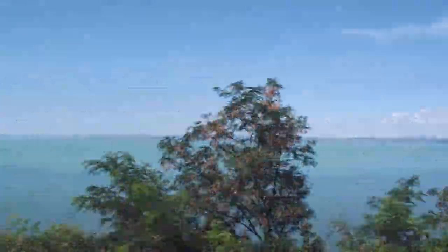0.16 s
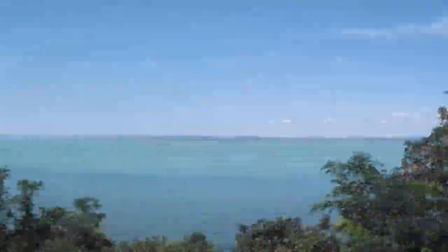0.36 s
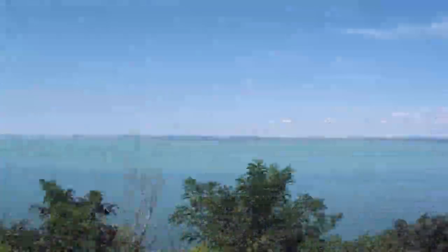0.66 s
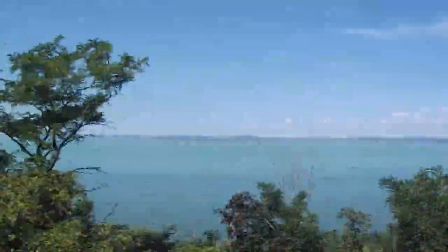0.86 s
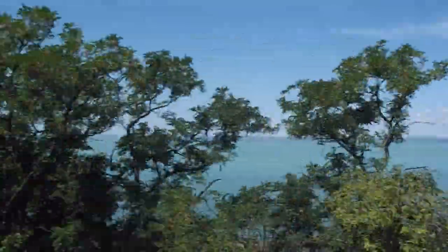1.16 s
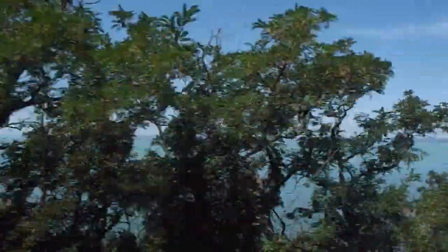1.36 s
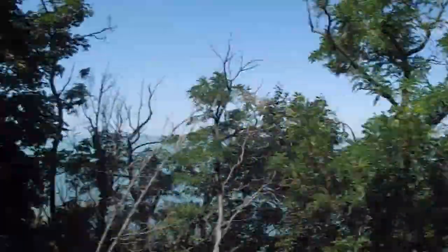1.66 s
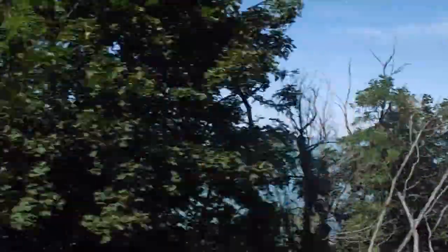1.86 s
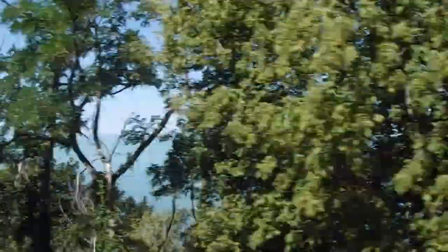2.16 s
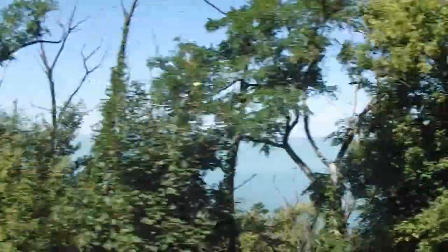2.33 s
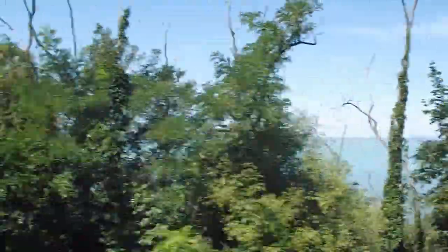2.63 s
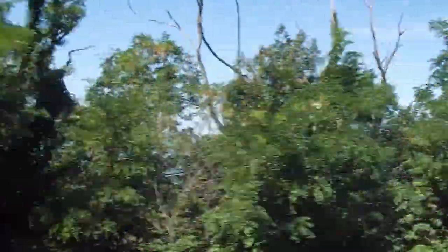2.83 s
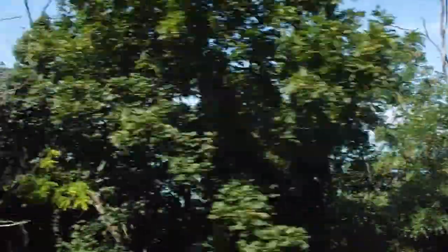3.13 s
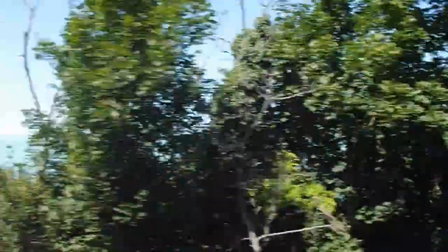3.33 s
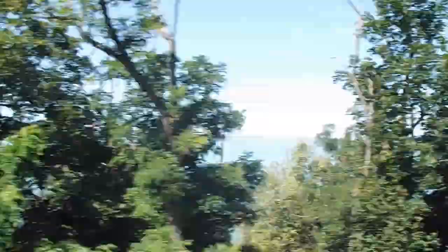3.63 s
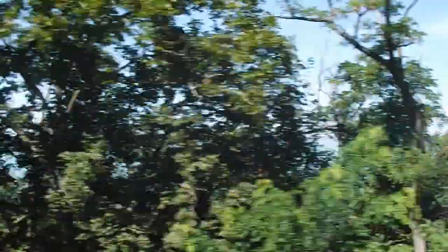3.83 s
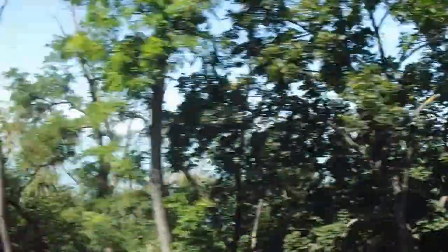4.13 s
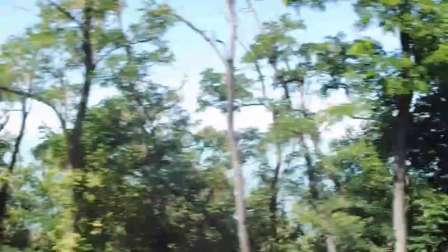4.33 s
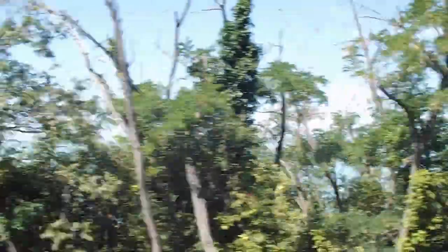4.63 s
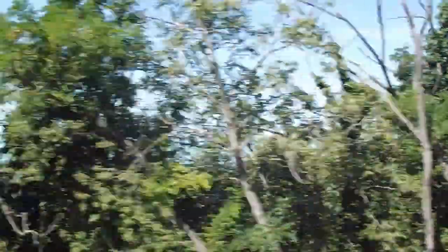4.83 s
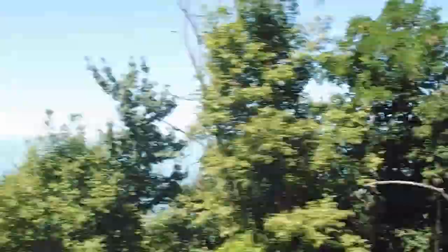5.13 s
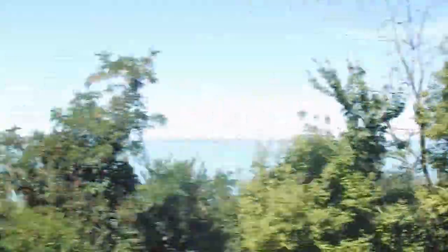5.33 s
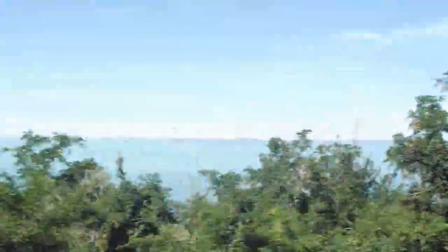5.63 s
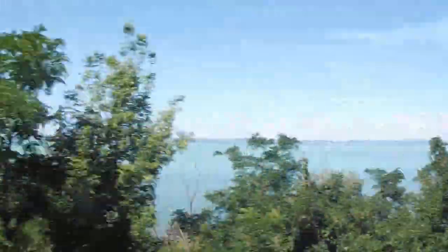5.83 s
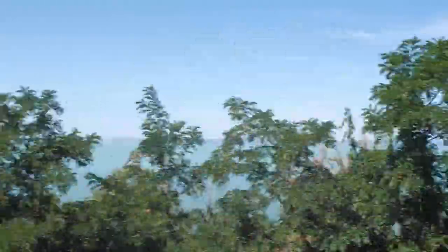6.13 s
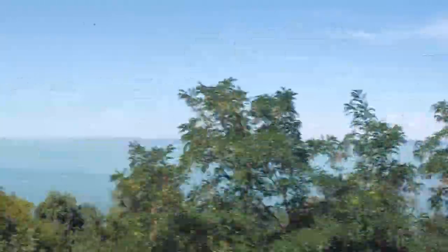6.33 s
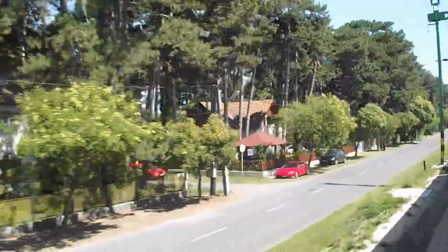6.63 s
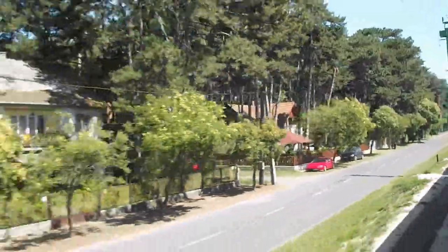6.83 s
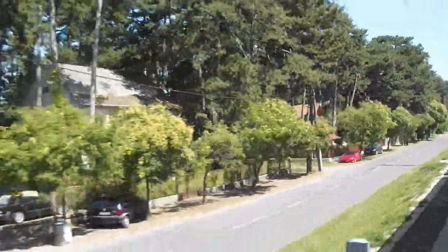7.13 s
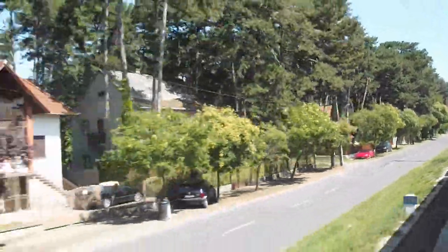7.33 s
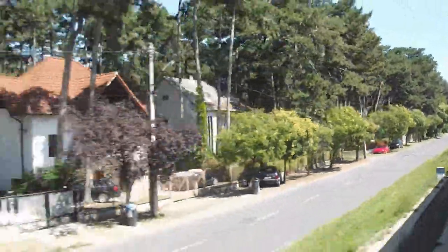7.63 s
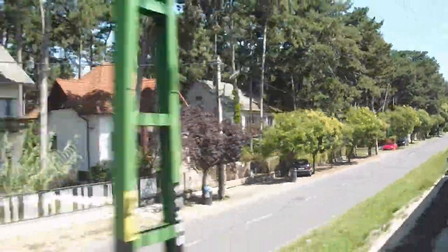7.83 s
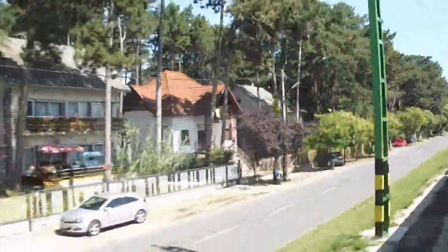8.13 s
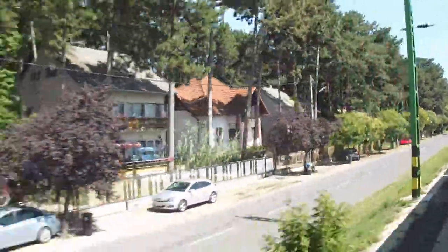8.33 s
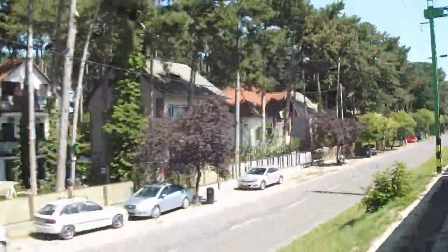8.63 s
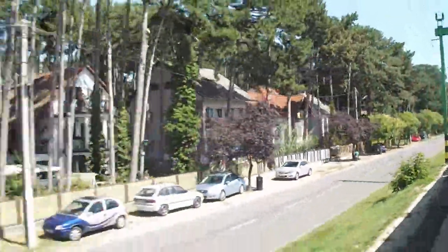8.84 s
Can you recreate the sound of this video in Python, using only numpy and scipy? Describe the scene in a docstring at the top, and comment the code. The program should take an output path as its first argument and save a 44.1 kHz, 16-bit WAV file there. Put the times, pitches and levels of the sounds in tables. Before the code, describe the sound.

A deep, uneven wind rumble hits the microphone directly, held at an open train window. From the start, brief gusts slam into it with distorted thumps and crackles, sometimes singly and sometimes in quick bunches. The soft rush of travel stays underneath. Later, as the train passes from shore to houses, smaller pops take over for a moment before hard, rasping knocks return.

```python
"""Wind batters a small microphone at the open window of a moving train.
Turbulence makes the pressure fluctuate: large eddies rumble, small ones flutter and pop.
Sudden gusts drive the input far into overload, where clipping turns them into square-edged
knocks and rasps. Behind them the rush of the ride hisses through the resonances of the
microphone port, first along the shore and then among houses."""
import sys
import numpy as np
from scipy import signal
from scipy.fft import rfft, irfft
from scipy.io import wavfile
from scipy.ndimage import uniform_filter1d, map_coordinates

SR = 44100
rng = np.random.default_rng(int(sys.argv[2]) if len(sys.argv) > 2 else 0)


def digitize_waveform(pressure):
    """Quantize a signal to 16-bit integers and store it at the path in sys.argv[1].

    Rows of a 2-D input are taken as channels; values are limited to [-1, 1].
    """
    field = np.atleast_2d(pressure).T
    bounded = np.clip(field, -1, 1)
    quanta = np.round(bounded * 32767).astype(np.int16)
    wavfile.write(sys.argv[1], SR, quanta)


N = 396018
TIME = np.arange(N) / SR
TOWN_S = 6.592  # the houses begin

# Gusts on the port, levels relative:
# (start [s], end [s], pressure [dB], nominal eddy rate [Hz], hiss [dB], extra gain of the slam [dB])
GUST_EVENTS = [(0, 0.063, -3.5, 156, -15, 4.5), (0.066, 0.117, -9, 49, -17, -14),
               (0.123, 0.206, 2.5, 55.4, -20, 8), (0.464, 0.535, 0.5, 74, -15.5, 13.5),
               (0.552, 0.637, 1.5, 65, -22.5, -12), (0.826, 0.87, 0, 96, -21, 16),
               (1.42, 1.482, 1, 35, -9, 5.5), (1.486, 1.56, 9.5, 99, -16, -6),
               (2.067, 2.118, 4.5, 188, -10, 15), (2.561, 2.62, -4, 66.6, -27.5, 12.5),
               (2.818, 2.848, 10.5, 44.8, -7.5, 6.5), (2.966, 2.997, -6.5, 37.2, -18, 14),
               (3.147, 3.193, 9, 112, -12, 12), (3.686, 3.719, 6.5, 58.7, -24, 16),
               (3.724, 3.743, 7, 125, -10.5, -8), (4.007, 4.029, 9.5, 93, -9.5, 6),
               (4.028, 4.067, -20, 48.7, -18, -1), (4.283, 4.313, 2, 34.2, -11, 3),
               (4.319, 4.373, -12.5, 150, -15.5, -14), (4.362, 4.416, -1.5, 37.3, -51, 4.5),
               (4.508, 4.579, 5.5, 155.5, -10, 16), (4.851, 4.874, 1.5, 118, -18, 16),
               (4.884, 4.961, -3.5, 163, -16, 11.5), (4.975, 5.068, -1, 50.3, -14.5, -7),
               (5.393, 5.442, 2.5, 35.8, -12.5, 10), (5.454, 5.509, -7, 68.4, -38, 8),
               (5.838, 5.903, 5.5, 150, -9, -3), (6.3, 6.321, -3.5, 91.4, -39, 27),
               (6.347, 6.37, 0, 110, -22.5, 3), (6.656, 6.754, 5.5, 164, -13.5, 11),
               (7.641, 7.686, 8, 282, -2, 4), (7.994, 8.037, 2, 265, -10.5, 22.5),
               (8.083, 8.142, 7, 303, -7, 19), (8.17, 8.279, -4.5, 162, -27, 5.5),
               (8.596, 8.62, 8, 217, -5.5, 4), (8.604, 8.782, 0.5, 147, -18.5, -5),
               (8.863, 8.909, 6.5, 260, -6, 14), (8.92, 8.99, 1.5, 47, -14, -14)]
# Single small eddies that pop on the port: (time [s], relative level [dB])
PUFF_EVENTS = [(0.284, -20), (0.398, -14), (0.666, -3.5), (1.139, -19), (2.419, -20), (3.415, -18.5),
               (4.476, -22), (5.191, -20), (6.17, -18.5), (6.482, -15), (6.603, -11), (6.846, -15),
               (6.989, -16), (7.092, -22), (7.184, -21), (7.243, -4.5), (7.34, -10), (7.389, -30),
               (7.457, -19), (7.833, -12.5), (7.957, 2), (8.361, -16.5), (8.404, -18.5)]
# Suction that pins the input to a rail: (middle [s], length [s])
STALL_EVENTS = [(2.132, .016), (8.018, 0.0085), (8.151, 0.0099)]
# Mean flow, heavier and slower along the shore than in town, levels relative:
# (time [s], large eddies [dB], small eddies [dB], rush [dB])
MEAN_FLOW = [(0, -16.5, -20, -43.5), (1.2, -18.5, -27.5, -38.5), (3.0, -14.5, -24.5, -41),
             (6.3, -15, -22, -39), (6.8, -19, -23.5, -45), (8.98, -19.5, -21.5, -44)]
# The stream leaves the port: (middle [s], length [s], change in small eddies [dB])
FLOW_LULLS = [(0.294, 0.16, -5), (0.75, 0.079, -2.5), (1.022, 0.087, -10), (1.2, 0.043, -13),
              (1.771, 0.072, -6.5), (2.394, 0.043, -19), (3.267, 0.033, -8.5), (3.383, 0.062, -10),
              (3.896, 0.036, -12), (4.605, 0.064, -11), (5.575, 0.054, -21), (6.144, 0.04, -35),
              (6.415, 0.085, -9), (6.511, 0.089, -9), (6.93, 0.086, -7.5), (8.321, 0.072, -10),
              (8.536, 0.046, -12)]
# Swells short of a gust: (middle [s], length [s], change in small eddies [dB])
FLOW_SWELLS = [(0.683, 0.041, 9), (1.145, 0.041, 4.5), (1.848, 0.03, 8.5), (2.18, 0.071, 3),
               (3.051, 0.061, 14.5), (3.578, 0.054, 5.5), (4.705, 0.032, 5), (5.104, 0.078, 12),
               (5.95, 0.12, 7.5), (6.998, 0.042, 6.5), (7.528, 0.067, 11), (7.625, 0.045, 14),
               (7.736, .07, 13), (7.886, 0.058, 11), (8.08, 0.033, 9), (8.395, 0.063, -2), (8.844, .04, 15)]
# Spectra of the eddies and of the ride: (frequency [Hz], relative density [dB])
LARGE_EDDY_SPECTRUM = [(8, -11.5), (20, 2), (45, 1.5), (95, -6.5), (135, -10), (220, -29), (600, -85)]
SMALL_EDDY_SPECTRUM = [(50, -19), (130, 2.5), (250, -2), (500, -9), (1000, -19), (2000, -26), (3300, -21.5),
                       (5000, -51), (12000, -71.5)]
RUSH_SPECTRUM = [(200, -10), (700, -6.5), (2100, -8), (2800, -1.5), (3400, 0.5), (4100, -10), (5100, -25),
                 (6300, -21.5), (8000, -16.5), (10000, -29), (15000, -44)]
TOWN_RUSH_SPECTRUM = [(200, -13), (700, -3), (1400, 0.5), (2100, -1), (3000, -1.5), (3550, 2.5),
                      (4100, -17), (5000, -34), (7800, -25), (10000, -39), (15000, -51)]


def gusts(attack_s, slam_s, release_s, hiss_release_s, flutter_db, spit_db,
          front_db, front_s, crack_db, crack_s):
    """Dynamic pressure: a gust slams in, shakes the diaphragm near its eddy rate and hisses in the port."""
    pressure = np.zeros(N)
    small = from_db(flutter_db) * flutter(lumpy_db=5.5, fine_db=3.0, split_hz=520)
    hiss = evened(noise(RUSH_SPECTRUM) * from_db(spit_db * drift(70)), seconds=0.019)
    crack = unit_rms(butterworth(rng.standard_normal(N), 620, "low", order=1))
    for start, end, pressure_db, eddy_hz, hiss_db, slam_db in GUST_EVENTS:
        near = slice(max(int((start - .03) * SR), 0), min(int((end + .15) * SR), N))
        age = TIME[near] - start
        since_start, since_end = np.maximum(age, 0), np.maximum(TIME[near] - end, 0)
        rise = np.clip(1 + age / attack_s, 0, 1)
        force = rise * from_db(slam_db * np.exp(-since_start / slam_s))
        eddies = butterworth(rng.standard_normal(SR), eddy_hz * 1.192, "low")
        eddies = butterworth(eddies, eddy_hz * 0.31, "high", order=1)
        eddies = evened(eddies, seconds=0.0293)[-len(age):]
        shaking = from_db(pressure_db) * (eddies + small[near]) * np.exp(-since_end / release_s)
        spitting = from_db(hiss_db) * hiss[near] * np.exp(-since_end / hiss_release_s)
        # a smooth front runs just ahead, then breaks up with a crack
        front = from_db(front_db) * np.exp(-(age / front_s) ** 2)
        breakup = from_db(crack_db + pressure_db) * rise * np.exp(-since_start / crack_s) * crack[near]
        pressure[near] += force * (shaking + spitting) + from_db(slam_db) * (front + breakup)
    return pressure


def puffs(push_db, grit_db, rise_s, snap_db, snap_s):
    """Convected eddies: each is a pressure pulse with fine turbulence inside and a snap at its crest."""
    pulse, crest = np.zeros(N), np.zeros(N)
    for start, level_db in PUFF_EVENTS:
        near = slice(int(start * SR), int(start * SR) + SR // 10)
        age = np.maximum(TIME[near] - start, 0)
        pulse[near] += from_db(level_db) * age / rise_s * np.exp(1 - age / rise_s)
        crest[near] += from_db(level_db) * np.exp(-np.abs(age - rise_s) / snap_s)
    grit = evened(butterworth(noise(SMALL_EDDY_SPECTRUM), 500, "high", order=1), seconds=0.011)
    snap = unit_rms(butterworth(rng.standard_normal(N), 5400, "low"))
    return pulse * (from_db(push_db) + from_db(grit_db) * grit) + from_db(snap_db) * crest * snap


def stalls(pressure_db):
    """Blocking: smooth suction biases the input into saturation, which chokes other sound."""
    return -from_db(pressure_db) * sum(bump(TIME, middle, length) for middle, length in STALL_EVENTS)


def breeze(large_db, small_db):
    """Turbulent pressure of the constant stream: large and small eddies surge together."""
    rumble = from_db(large_db - 0.14) * evened(noise(LARGE_EDDY_SPECTRUM), seconds=0.064)
    buffets = from_db(small_db - 0.7) * flutter(lumpy_db=4.5, fine_db=1.85, split_hz=890)
    return (rumble + buffets) * evened(from_db(3.6 * drift(15)), seconds=0.2)


def flutter(lumpy_db, fine_db, split_hz):
    """Intermittency: small eddies come in clumps, the finest gathered at the heart of each."""
    clumps, air = drift(32), noise(SMALL_EDDY_SPECTRUM)
    coarse = butterworth(air, split_hz, "low", order=1)
    fine = (air - coarse) * unit_rms(from_db(fine_db * clumps))
    return evened((coarse + fine) * from_db(lumpy_db * clumps), seconds=0.072)


def airflow(slack_lead_s, slack_s, slack_db, wake_s, wake_eddies_db, wake_rush_db, large_share):
    """Amplitude modulation by the flow: air slackens before a gust and stays stirred up in its wake."""
    control_time = TIME[::100]
    slack = wake = 0
    for start, end, *_ in GUST_EVENTS:
        slack = np.maximum(slack, bump(control_time, start - slack_lead_s, slack_s))
        since_end = np.maximum(control_time - end, 0)
        wake = np.maximum(wake, (control_time > start) * np.exp(-since_end / wake_s))
    surge_db = sum(db * bump(control_time, s, length) for s, length, db in FLOW_LULLS + FLOW_SWELLS)
    surge_db = surge_db + slack_db * slack * (1 - wake) + wake_eddies_db * wake
    surge_db, wake = np.interp(TIME, control_time, surge_db), np.interp(TIME, control_time, wake)
    times, *levels = np.transpose(MEAN_FLOW)
    large_db, small_db, rush_db = [np.interp(TIME, times, level) for level in levels]
    return large_db + large_share * surge_db, small_db + surge_db, rush_db + wake_rush_db * wake


def overload(x, ceiling, hardness):
    """Saturation: the input stage flattens everything beyond its rails."""
    return x / (1 + np.abs(x / ceiling) ** hardness) ** (1 / hardness)


def ticks(x, knee, level_db):
    """Threshold crossing: the input ticks faintly whenever a swell of pressure nears overload."""
    above_knee = np.abs(butterworth(x, 400, "low")) > knee
    onsets = np.diff(above_knee * 1., prepend=0) > 0
    sizes = from_db(level_db + 4 * np.clip(rng.standard_normal(N), -2, 1.5))
    return butterworth(onsets * np.sign(x) * sizes + 1e-18, 4400, "low", order=1)


def rush(level_db):
    """Port resonance: ride noise is coloured near 3 and 8 kHz, and is duller among the houses."""
    shore = from_db(-1.0) * noise(RUSH_SPECTRUM)
    town = from_db(4.5) * noise(TOWN_RUSH_SPECTRUM)
    return from_db(level_db + 0.66 * drift(28)) * np.where(TIME < TOWN_S, shore, town)


def noise(spectrum):
    """Spectral shaping of white noise, at unit power."""
    hz, db = np.transpose(spectrum)
    bin_hz = np.maximum(np.arange(N // 2 + 1) * SR / N, 1)
    gain = from_db(np.interp(np.log(bin_hz), np.log(hz), db))
    return unit_rms(irfft(rfft(rng.standard_normal(N)) * gain, N))


def drift(hz):
    """Smooth random modulation up to about hz, at unit power."""
    knots = rng.standard_normal(int(N / SR * 2 * hz) + 4)
    coarse = map_coordinates(knots, [TIME[::32] * 2 * hz], order=3, mode="nearest")
    return unit_rms(np.interp(TIME, TIME[::32], coarse))


def evened(x, seconds):
    """Running normalisation: fast lumps remain while mean power stays near 1."""
    return x / np.sqrt(np.maximum(uniform_filter1d(x ** 2, int(seconds * SR)), 0) + 1e-4)


def bump(time, middle_s, length_s):
    """Gaussian pulse of height 1."""
    return np.exp(-np.minimum((2 * (time - middle_s) / length_s) ** 2, 50))


def butterworth(x, hz, kind, order=2):
    """Maximally flat filter."""
    return signal.sosfilt(signal.butter(order, hz, kind, fs=SR, output="sos"), x)


def from_db(db):
    """Decibels to amplitude ratio."""
    return 10 ** (np.asarray(db) / 20)


def unit_rms(x):
    """Normalisation to unit power."""
    return x / np.sqrt(np.mean(x ** 2) + 1e-20)


def scene():
    """Superposition: all pressures add at one port; the left channel trails by one sample."""
    large_db, small_db, rush_db = airflow(slack_lead_s=.06, slack_s=.08, slack_db=-4, wake_s=.09,
                                          wake_eddies_db=3.5, wake_rush_db=9, large_share=.5)
    air = breeze(large_db, small_db) + rush(rush_db) + stalls(pressure_db=3.5)
    air += puffs(push_db=4, grit_db=-4, rise_s=0.0011, snap_db=-17, snap_s=0.0005)
    air += gusts(attack_s=0.00102, slam_s=0.0091, release_s=0.0052, hiss_release_s=0.0064,
                 flutter_db=-9, spit_db=2.0, front_db=-16.5, front_s=0.005, crack_db=-13, crack_s=0.0073)
    air *= abs(TIME - TOWN_S) > .008  # the sound drops out for an instant where the scene changes
    return np.array([np.pad(air, (1, 0))[:N], air])


def record(dry):
    """Clipping, capacitive coupling that makes the flat tops sag, and a band limit."""
    clipped = overload(dry, ceiling=.48, hardness=9)
    # a little treble leaks past the stage even while it is pinned to a rail
    excess_treble = butterworth(dry - clipped, 1500, "high")
    leak = .035 * butterworth(np.tanh(5 * excess_treble), 6000, "low")
    crackle = ticks(dry, knee=.26, level_db=-18)
    sagging = butterworth(clipped + leak + crackle, 3, "high", order=1)
    band_limit = signal.ellip(10, .1, 90, 16200, fs=SR, output="sos")
    return signal.sosfilt(band_limit, sagging)


dry = scene()
out = record(dry)
digitize_waveform(out)
```